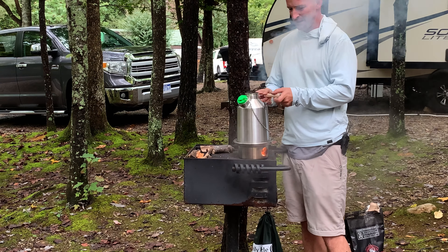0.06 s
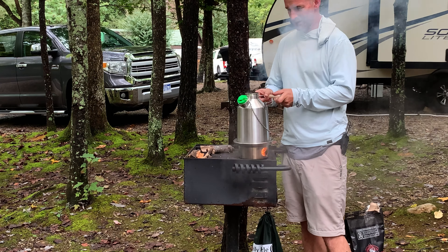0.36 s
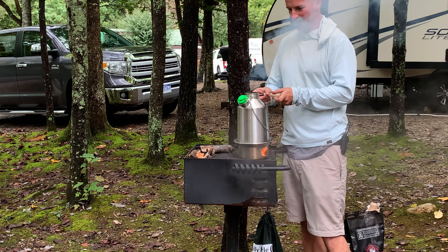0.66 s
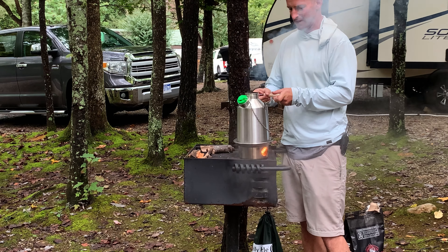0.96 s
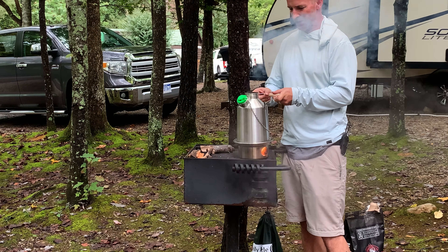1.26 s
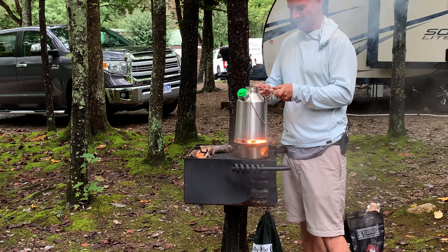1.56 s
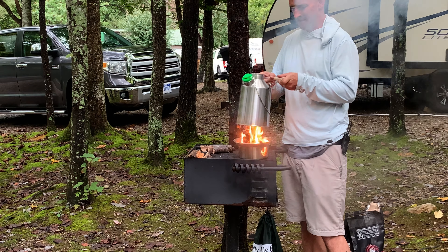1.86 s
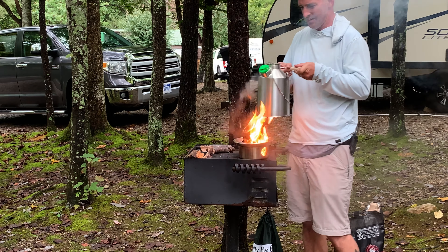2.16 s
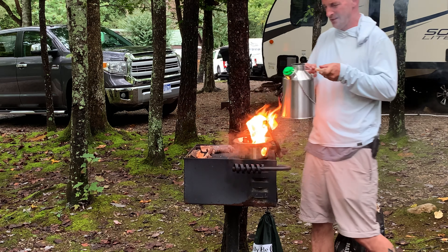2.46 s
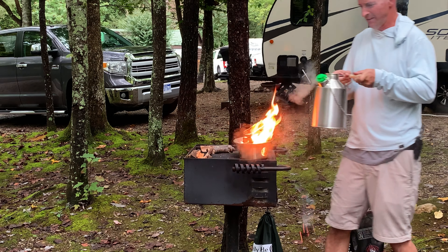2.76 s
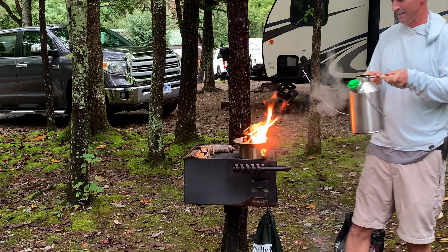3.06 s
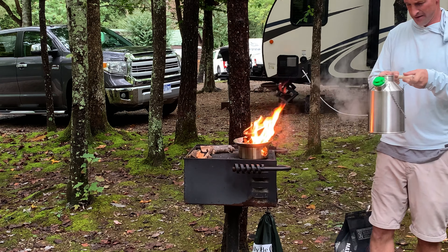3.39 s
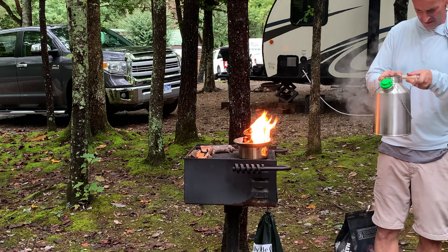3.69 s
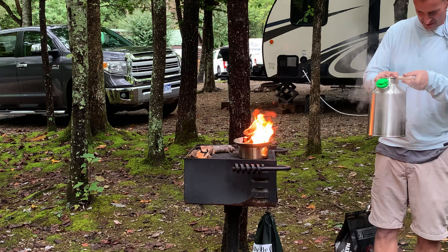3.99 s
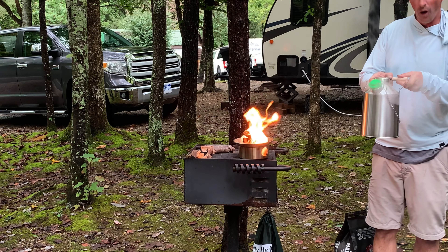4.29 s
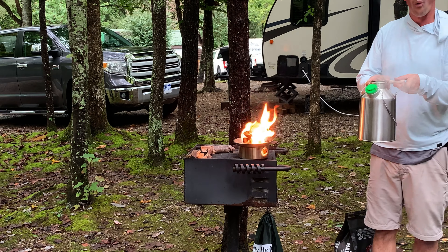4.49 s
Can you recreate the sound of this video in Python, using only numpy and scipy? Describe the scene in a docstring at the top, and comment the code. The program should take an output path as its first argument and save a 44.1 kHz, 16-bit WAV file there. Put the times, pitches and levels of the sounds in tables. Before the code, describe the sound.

A kettle on a wood fire whistles with a very high, shrill note, droplets spitting through it. About halfway it is lifted with a light knock, and the whistle slides steadily down, fluttering, then collapses into a soft breathy hoot. Steam hisses and the fire snaps sharply a couple of times. One microphone near the stove at an open-air campsite also picks up a low rush of air, a distant idling engine and a growing hum.

```python
"""A campsite among trees, one microphone near the stove. A kettle whistles shrilly as its steam jet
locks to the spout, and droplets spit through the note. Lifted off the fire, it loses pressure: the
note slides down and collapses into a breathy hoot. Steam hisses, bubbles crackle, the handle knocks
and the wood fire snaps. Some way off an engine idles beside a machine hum, in the low rush of the air."""
import sys
import numpy as np
from scipy import signal
from scipy.fft import rfft, irfft
from scipy.io import wavfile
from scipy.ndimage import uniform_filter1d

SR = 44100
rng = np.random.default_rng(int(sys.argv[2]) if len(sys.argv) > 2 else 0)


def dump(signal):
    """Clip the signal to [-1, 1] and save it as 16-bit WAV at the path in sys.argv[1]."""
    limited = np.clip(np.atleast_2d(signal).T, -1, 1)
    pcm = np.round(limited * 32767).astype(np.int16)
    wavfile.write(sys.argv[1], SR, pcm)


N = 222384
T = np.arange(N) / SR
LIFT_S, UNLOCK_S = 2.3, 3.7  # the kettle comes clear of the fire; the jet loses its lock
BAND_LIMIT_HZ = 15850


# The note, steady on the fire and sinking once lifted. Each row: time in seconds, pitch in Hz.
NOTE_PITCH = [(0, 6043), (1.6, 6042), (1.86, 6112), (2.2, 5712), (2.292, 5872), (2.446, 5464),
              (2.602, 5087), (2.746, 4736), (2.88, 4353), (3.024, 3908), (3.168, 3620), (3.446, 3219),
              (3.6, 3062), (3.668, 2852), (3.71, 2680)]
# The note at the microphone as the kettle swings away. Each row: time in seconds, level in dB.
NOTE_LEVEL = [(0, -16.5), (1.8, -16.5), (2.15, -16), (2.166, -16.5), (2.21, -28), (2.254, -23), (2.31, -32),
              (2.32, -22), (2.526, -28.5), (2.546, -17.5), (2.682, -27), (2.73, -25), (3.076, -36.5),
              (3.29, -25), (3.36, -37.5), (3.404, -25.5), (3.662, -31.5), (3.72, -44)]
# Its octave, strongest as the pressure falls. Each row: time in seconds, level in dB.
OCTAVE_LEVEL = [(0, -48), (0.749, -46), (1.751, -47.5), (2.331, -60), (2.601, -63), (2.74, -51.5),
                (3.279, -35.5), (3.62, -44), (3.72, -63)]
# The third partial; the fourth lies 10 dB lower. Each row: frequency in Hz, dB against the note.
OVERTONE_COLOUR = [(8300, -33), (9400, -43), (10200, -66), (11300, -51.5), (12400, -39), (14000, -44),
                   (15700, -40)]
# The note breaking into half tones. Each row: time in seconds, dB against the note.
HALF_TONE_LEVEL = [(2.3, -68), (2.62, -34), (2.72, -27), (2.91, -15), (2.949, -41), (3.7, -47)]

def whistle():
    """The jet locks to the spout; spurts push its pitch up and choke it, and the boil shakes it."""
    hz, note_db = follow(NOTE_PITCH), follow(NOTE_LEVEL)
    tremble = (.0014 + .0025 * until(1.3, fade=1.2)) * wander(rate_hz=28)
    lift_hz, rasp = spurts()
    hz += lift_hz
    note_db -= 3 * rasp / gain_of(-39.5)  # a strong spurt chokes the note by about 3 dB
    note = gain_of(note_db)
    # moving water unsettles the pitch, more once the kettle is carried
    surge = (.005 - .003 * until(LIFT_S, fade=.089)) * wander(rate_hz=16)
    phase = phase_of(hz * (1 + tremble + surge))
    tone = fluttering(phase, note) + fluttering(2 * phase, gain_of(follow(OCTAVE_LEVEL)))
    for k, trim_db in (3, 0), (4, -10):
        partial_db = note_db + np.interp(k * hz, *np.transpose(OVERTONE_COLOUR)) + trim_db
        tone += fluttering(k * phase, gain_of(partial_db)) * (k * hz < SR / 2)
    # every second eddy weakens: tones at one half and three halves of the note
    halves = gain_of(-5.5) * breathy(hz / 2, width_hz=120) + breathy(1.5 * hz, width_hz=180)
    halves *= gain_of(follow(HALF_TONE_LEVEL))
    skirt = gain_of(-27) * breathy(hz, width_hz=150)
    breath = gain_of(-20.5) * breathy(hz, width_hz=225) * (1 - until(LIFT_S, fade=.1))
    return (tone + note * (halves + skirt + breath)) * until(UNLOCK_S, fade=.025)


def fluttering(phase, level):
    """A partial beats with its echoes: smooth with the spout facing the microphone, ragged off axis."""
    direct = np.exp(1j * phase)
    scattered = echoes(direct, t60=.17)
    scattered /= np.sqrt(abs(uniform_filter1d(abs(scattered) ** 2, size=6000)) + 1e-9)
    # the echoes carry the average power, whichever way the spout points
    echo_gain = np.minimum(gain_of(-3.5) * uniform_filter1d(level, size=26000), gain_of(-1) * level)
    direct_gain = np.sqrt(np.maximum(level ** 2 - echo_gain ** 2, 0))
    mix = direct_gain * direct + echo_gain * scattered
    relative_power = uniform_filter1d(abs(mix / level) ** 2, size=4000)
    return np.sqrt(2) * mix.real / np.sqrt(relative_power + 1e-9)


# The boil spitting through the spout.
# Each row: start in seconds, length in seconds, pitch lift in Hz, relative rasp in dB.
BOIL_SPURTS = [(0.0, .095, 155, -48.5), (.135, .145, 135, -41.5), (0.418, 0.052, 113.5, -42.5),
               (.525, .075, 110, -44.5), (0.636, .16, 115, -44), (0.803, .07, -0.5, -45.5),
               (0.884, .04, 71, -37.5), (.92, .15, 195, -39.5), (1.108, .065, 34, -38.5),
               (1.172, .11, 180, -42.5), (1.292, .11, 105, -42), (1.398, 0.11, 150, -41),
               (1.506, .2, 42, -38.5), (1.702, .06, 93, -42), (1.755, 0.069, 22.5, -41),
               (1.909, 0.07, 15, -37), (2.008, .04, 18, -43.5), (2.059, 0.036, 4.5, -40)]

def spurts():
    """Each spurt rises, holds and falls; gives their summed pitch lift in Hz and rasp as a gain."""
    pitch_edge_s, rasp_edge_s = .04, .035
    lift_hz, rasp = np.zeros(N), np.zeros(N)
    for start, length, hz, db in BOIL_SPURTS:
        inside_s = np.minimum(T - start, start + length - T)
        lift_hz += hz * np.clip(.5 + inside_s / pitch_edge_s, 0, 1)
        rasp += gain_of(db) * np.clip(.5 + inside_s / rasp_edge_s, 0, 1)
    return lift_hz, rasp


def sputter():
    """Droplets in the spout scatter the note into a rasp, mostly just above it, in quick spurts."""
    _, spurt_gain = spurts()
    level = gain_of(-56) + spurt_gain  # a faint rasp stays between spurts
    rasp = noise([(3500, -48.5), (5000, -10.5), (5750, 3.5), (6300, 10),
                  (7200, -3), (7600, -17.5), (8200, -59.5), (11000, -51)])
    flicker_db = 2.2 * wander(rate_hz=30)
    return level * gain_of(4.5 + flicker_db) * rasp * until(2.15, fade=.041)


# The spout's hoot. Each row: time in seconds, lower resonance in dB, upper resonance in dB.
HOOT_LEVELS = [(3.7, -45.5, -50.5), (3.82, -47.5, -65), (3.9, -46, -49.5), (4.12, -45.5, -49.5),
               (4.33, -54, -52), (4.78, -53, -57), (5.04, -59.5, -52.5)]

def hoot():
    """Too slow to lock, the steam breathes through the spout's resonances, which sink with pressure."""
    drain_s, rest_hz, unlock_hz = .66, 890, 2095
    age = np.maximum(T - UNLOCK_S, 0)
    pressure = np.exp(-age / drain_s)
    hz = rest_hz + (unlock_hz - rest_hz) * pressure
    lower = breathy(hz, width_hz=60) + gain_of(-7) * breathy(hz, width_hz=220)
    lower *= gain_of(follow(HOOT_LEVELS))
    upper = breathy(2 * hz, width_hz=85) + gain_of(-16) * breathy(3 * hz, width_hz=160)
    upper *= gain_of(follow(HOOT_LEVELS, column=2))
    dying_note = gain_of(-44.5 - 33 * abs(T - 3.73)) * breathy(2650, width_hz=380)
    cap_ring = gain_of(-70) * breathy(5950, width_hz=35)
    squeal = breathy(5600 + 1200 * pressure, width_hz=210)
    squeal *= gain_of(-58.5 - 11 * age) * until(4.12, fade=.11)
    return (lower + upper + dying_note + cap_ring + squeal) * (1 - until(3.64, fade=.057))


# The broad rush of the jet. Each row: time in seconds, level in dB.
RUSH_LEVEL = [(0, -46), (1, -45), (1.7, -45.5), (2.2, -50.5), (2.6, -49.5), (3.1, -54), (3.7, -59),
              (4.2, -59.5), (5.04, -73)]
# Its spectrum. Each row: frequency in Hz, relative level in dB.
RUSH_SPECTRUM = [(500, -9), (1200, -10), (2000, 6.5), (2750, 10.5), (3800, 0), (5000, -6.5), (7000, -24.5),
                 (8500, -69.5), (10500, -45.5), (15500, -18.5)]
# The hiss opens up as the spout turns to the microphone. Each row: time in seconds, level in dB.
HISS_LEVEL = [(0, -80), (2.3, -57), (2.45, -49.5), (2.9, -48), (3.5, -72), (3.7, -58.5), (4.1, -63),
              (5.04, -64)]
# Its spectrum. Each row: frequency in Hz, relative level in dB.
HISS_SPECTRUM = [(2500, -11.5), (4500, 5.5), (6500, 5), (8000, -5.5), (9500, -13.5), (11000, -40.5),
                 (15500, -17)]

def steam():
    """The jet rushes and hisses, flickering with the boil."""
    flicker_db = 1.4 * wander(rate_hz=11)
    rush = gain_of(follow(RUSH_LEVEL) + flicker_db) * noise(RUSH_SPECTRUM)
    hiss = gain_of(follow(HISS_LEVEL) + flicker_db) * noise(HISS_SPECTRUM)
    return rush + hiss


def simmer():
    """Small bubbles burst in a fine, faint crackle."""
    pops_per_s, decay_s = 70, .0011
    pops = (rng.random(N) < pops_per_s / SR) * gain_of(5.6 * np.minimum(rng.exponential(1, N), 3))
    bursts = signal.fftconvolve(pops, np.exp(-T[:1000] / decay_s))[:N]
    fizz = noise([(1500, -12.5), (4000, 6), (7500, 3), (9500, -14.5), (15500, -9.5)])
    return gain_of(-68.5) * unit_rms(bursts * fizz)


# Fire snaps and handle knocks at the stove. Each row: start in seconds, level in dB,
# centre in Hz, octaves to either side, seconds to fall by 60 dB.
SNAPS_AND_KNOCKS = [(0.283, -26, 2400, 0.37, 0.016), (0.286, -31.5, 1090, 0.99, 0.032),
                    (0.289, -35.5, 2480, 0.32, 0.11), (2.219, -33.5, 4100, 1, 0.022),
                    (2.389, -37, 1026, 0.094, 0.34), (2.394, -35.5, 880, 1.03, 0.21),
                    (2.41, -47, 1620, 0.84, 0.11), (2.8865, -19.5, 2700, 0.7, 0.012),
                    (2.887, -30, 268, 1.16, 0.031), (2.901, -42, 2140, .04, 0.083)]

def snaps_and_knocks():
    """Each blow is a short dying rattle in one resonance, followed by its echoes."""
    blows, t = np.zeros(N), T[:SR // 3]
    for start, db, centre_hz, octaves, t60 in SNAPS_AND_KNOCKS:
        edges_hz = np.minimum([centre_hz / 2 ** octaves, centre_hz * 2 ** octaves], BAND_LIMIT_HZ)
        resonance = signal.butter(2, edges_hz, "bandpass", fs=SR, output="sos")
        decay = gain_of(-60 * t / t60)
        ring = unit_rms(signal.sosfilt(resonance, rng.standard_normal(len(t)) * decay))
        blows[round(start * SR):][:len(t)] += gain_of(db) * ring * np.sqrt(np.mean(decay ** 2))
    return blows + gain_of(-6) * echoes(blows, t60=.15)


# The engine some way off. Each row: time in seconds, firing rate in Hz, gain in dB.
IDLE_CURVE = [(0, 35.34, -3), (1.3, 35.36, -1.5), (2, 36.07, -0.5), (3.2, 36.66, 0), (4, 36.11, 3),
              (5.04, 36.65, 2.5)]
# Its orders. Each row: multiple of the firing rate, level in dB before that gain.
IDLE_ORDERS = [(1, -45), (1.5, -42.5), (2, -40.5), (2.5, -49.5), (3.5, -54), (4, -59.5)]
# The machine hum beside it, growing louder. Each row: time in seconds, level in dB.
HUM_LEVEL = [(0, -49.5), (1.5, -50.5), (2.5, -45), (3.3, -43.5), (4.2, -39), (5.04, -33)]

def engine():
    """Low orders of an uneven idle throb against a machine hum."""
    firing_hz, idle_db, hum_hz = follow(IDLE_CURVE), follow(IDLE_CURVE, column=2), 59.9
    phase = phase_of(firing_hz * (1 + .0051 * wander(rate_hz=3.3)))
    idle = np.zeros(N)
    for order, db in IDLE_ORDERS:
        idle += gain_of(db + wander(rate_hz=.92)) * np.sin(order * phase + 2 * np.pi * rng.random())
    hum = np.sin(phase_of(hum_hz * (1 + .0092 * wander(rate_hz=2.35))))
    return np.sqrt(2) * (gain_of(idle_db) * idle + gain_of(follow(HUM_LEVEL)) * hum)


# The air all around the microphone. Each row: frequency in Hz, relative level in dB.
AIR_SPECTRUM = [(15, -27), (30, -2.5), (60, 9), (105, -2), (155, 0), (260, -7.5), (350, -6), (480, -11),
                (1100, -9), (2200, -15.5), (3500, -24), (5000, -37.5), (7800, -48), (10000, -45.5),
                (15500, -54.5)]

def campsite_air():
    """Open air and the draught of the fire make a low, slightly wavering rush."""
    return gain_of(-41.5 + .5 * wander(rate_hz=6.6)) * noise(AIR_SPECTRUM)


def echoes(x, t60):
    """Scattered returns from ground, stove and trunks, falling by 60 dB in t60 seconds."""
    t = T[:SR // 2]
    taps = rng.standard_normal(len(t)) * (rng.random(len(t)) < .03)
    taps *= (t > .002) * gain_of(-60 * t / t60)
    return signal.fftconvolve(x, taps / np.linalg.norm(taps))[:N]


def gain_of(db):
    return 10 ** (np.asarray(db) / 20)


def unit_rms(x):
    return x / np.sqrt(np.mean(abs(x) ** 2) + 1e-20)


def phase_of(hz):
    return 2 * np.pi * np.cumsum(hz * np.ones(N)) / SR


def follow(rows, column=1):
    """One column of a time curve at every sample."""
    columns = np.transpose(rows)
    return np.interp(T, columns[0], columns[column])


def until(s, fade):
    """One up to the time s, then falling to zero over fade seconds."""
    return np.clip(1 - (T - s) / fade, 0, 1)


def noise(spectrum):
    """Noise of unit size, shaped by (Hz, dB) points."""
    hz, db = np.transpose(spectrum)
    shape_db = np.interp(np.log(np.fft.rfftfreq(N, 1 / SR) + 1), np.log(hz), db)
    return unit_rms(irfft(rfft(rng.standard_normal(N)) * gain_of(shape_db), N))


def wander(rate_hz):
    """Smooth chance motion of unit size."""
    hz = np.fft.rfftfreq(N, 1 / SR)
    return unit_rms(irfft(rfft(rng.standard_normal(N)) / (1 + (hz / rate_hz) ** 2), N))


def breathy(hz, width_hz):
    """Turbulence ringing a resonance that follows hz."""
    turbulence = wander(width_hz) + 1j * wander(width_hz)
    return unit_rms((turbulence * np.exp(1j * phase_of(hz))).real)


def scene():
    """Kettle, fire and background meet at one microphone."""
    air = campsite_air()
    kettle = whistle() + sputter() + hoot() + steam() + simmer()
    return (kettle + snaps_and_knocks() + engine() + air)[None]


def record(dry):
    """The microphone port puts a dip in the high treble; a steep low-pass limits the band."""
    hz = np.fft.rfftfreq(2 * N, 1 / SR)
    dip_db = -9 * np.exp(-((hz - 10700) / 800) ** 2)
    fade_in = np.minimum(T / .004, 1)
    coloured = irfft(rfft(dry * fade_in, 2 * N) * gain_of(dip_db), 2 * N)[:, :N]
    low_pass = signal.firwin(511, BAND_LIMIT_HZ, window=("kaiser", 9), fs=SR)
    return signal.oaconvolve(coloured, low_pass[None], "same")


dry = scene()
out = record(dry)
dump(out)
```